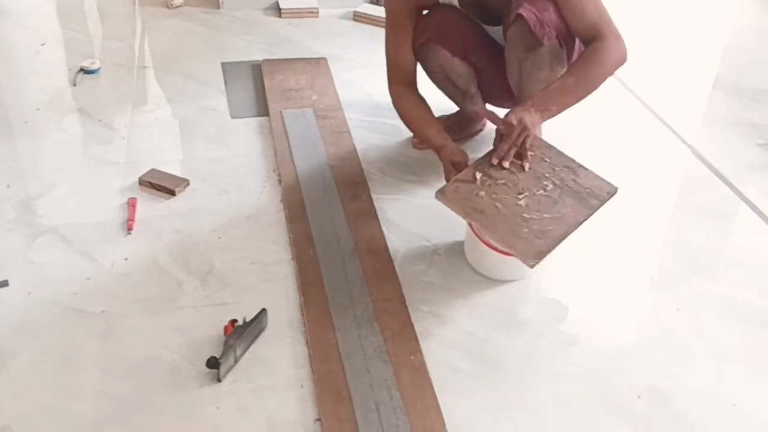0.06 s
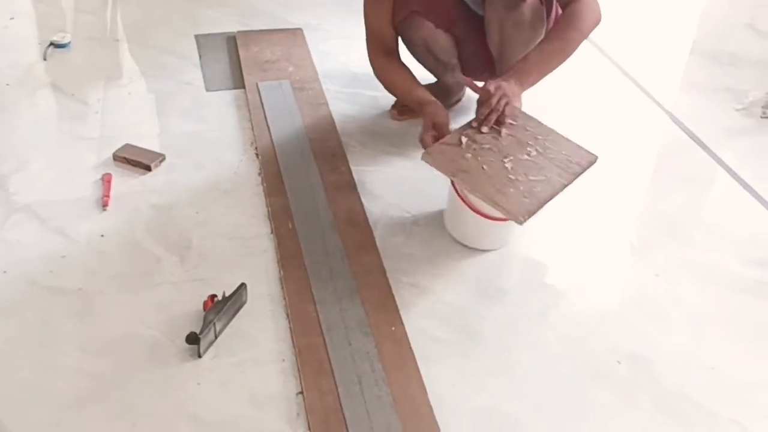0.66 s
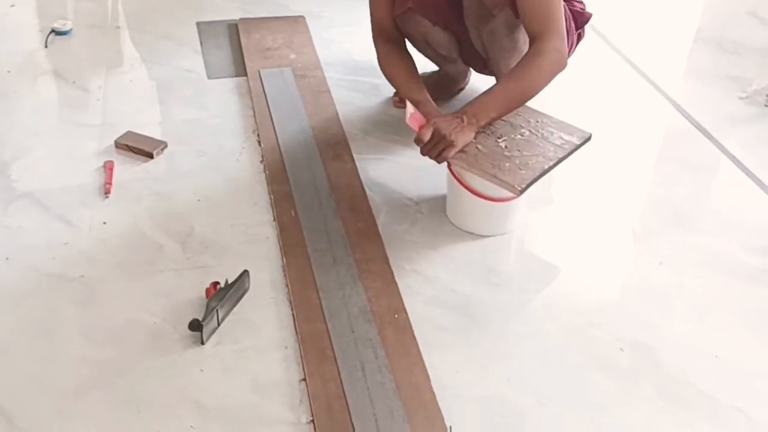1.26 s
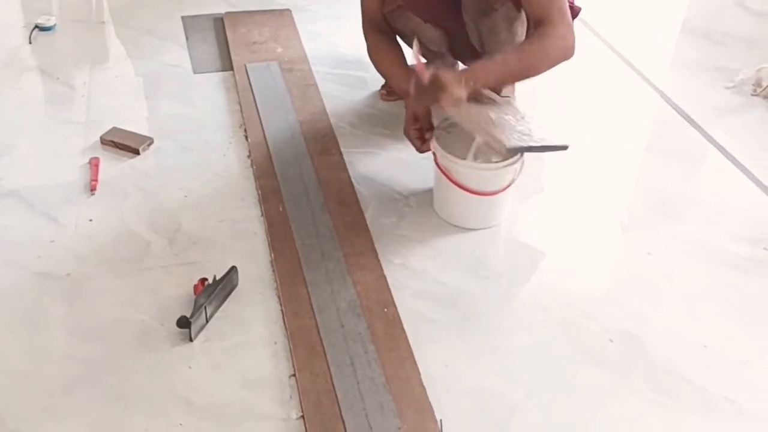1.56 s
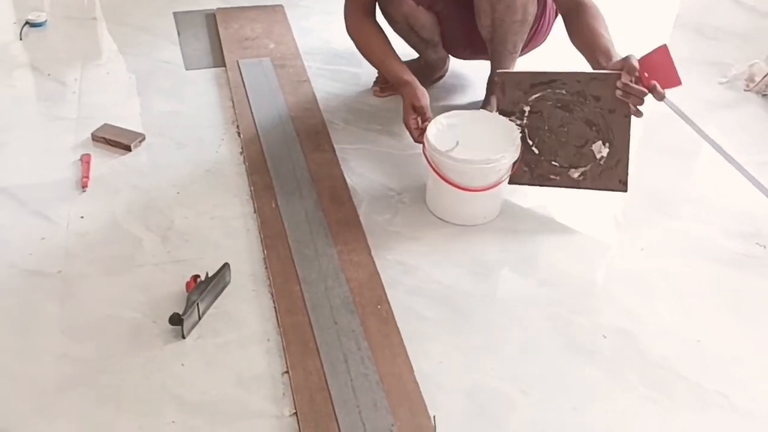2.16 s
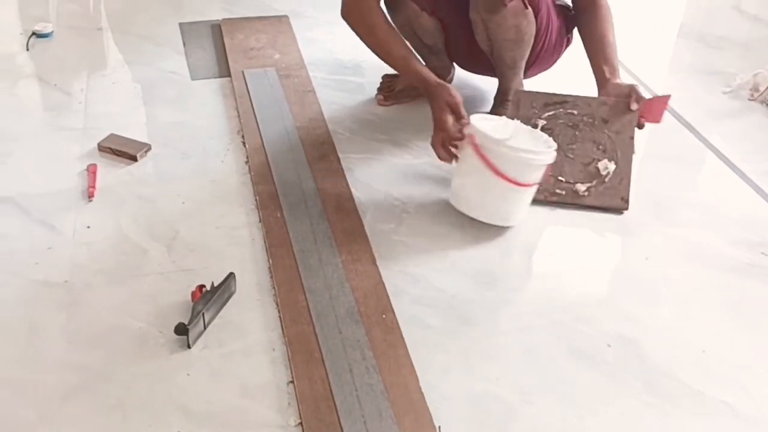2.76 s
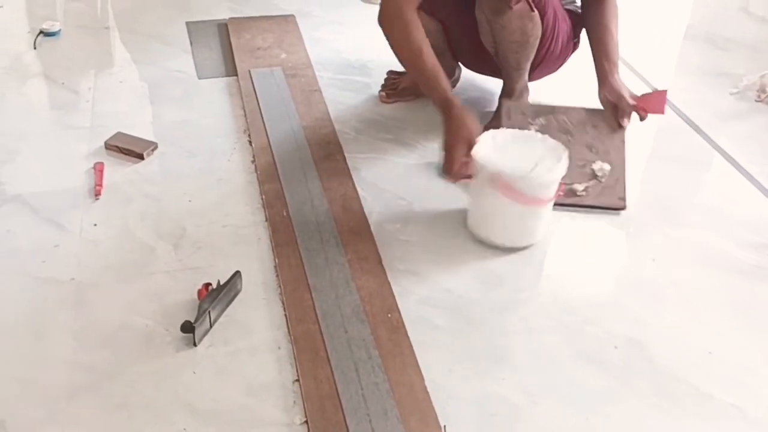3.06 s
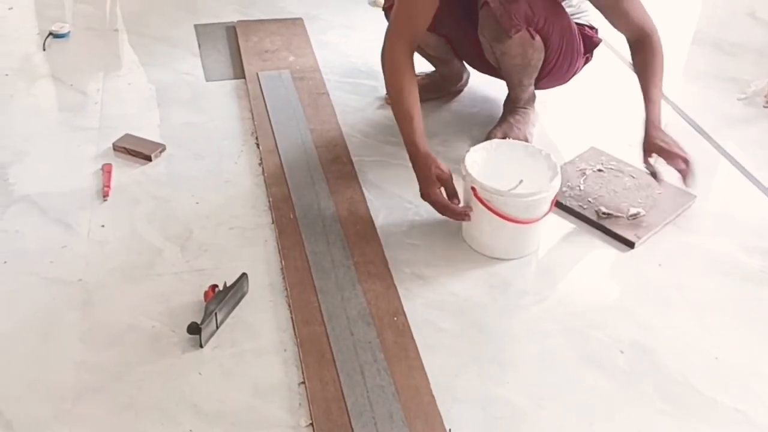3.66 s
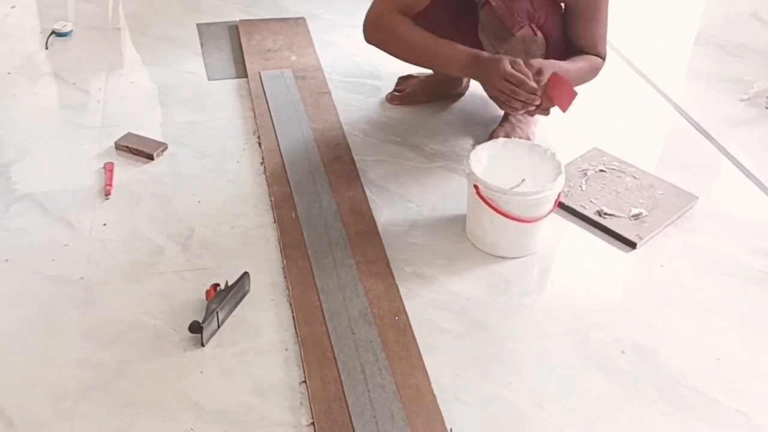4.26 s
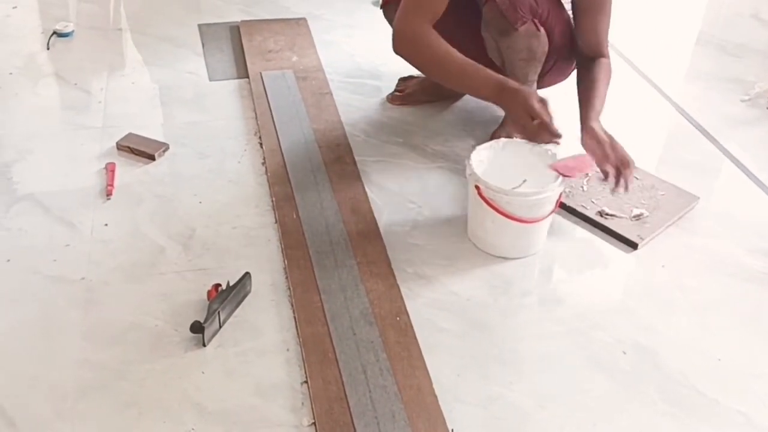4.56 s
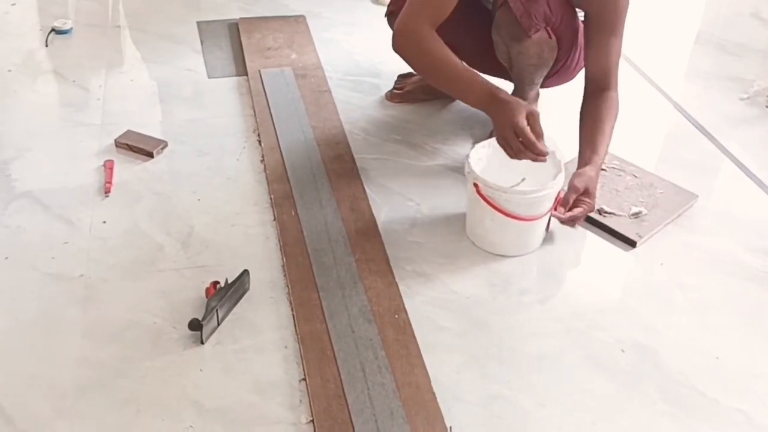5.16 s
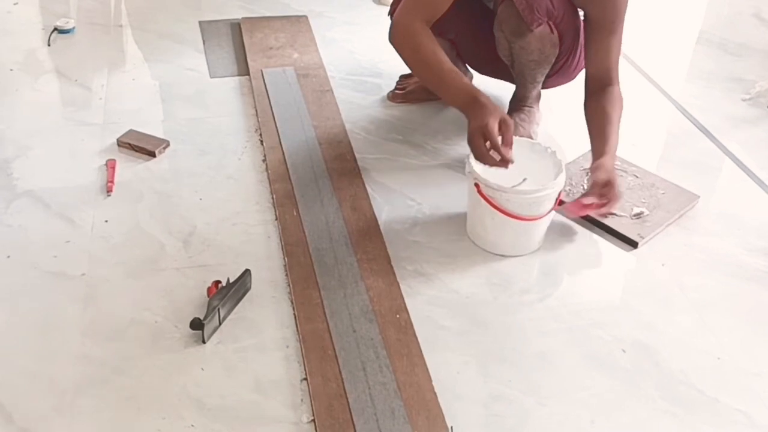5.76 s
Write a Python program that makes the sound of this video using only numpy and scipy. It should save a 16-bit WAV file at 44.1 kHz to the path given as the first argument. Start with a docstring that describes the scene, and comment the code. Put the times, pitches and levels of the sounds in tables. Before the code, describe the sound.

A plastic spatula snaps sharply at the start, ringing briefly in a bare, echoing room over a faint steady hush. Around 1 second come light taps on a tile and a soft bump. From 1.5 seconds grit crunches and a plastic bucket's rim groans faintly, then the tile rasps off it at about 2 seconds. At 2.5 seconds the tile thuds loudly onto its edge and rocks with a slight ring. The bucket lands with a click and hollow knocks near 3.2 seconds. At 3.4 the tile claps flat on the hard floor, bouncing and settling by 4 seconds. Dull bumps and shuffles of shifting weight follow. Near 4.9 seconds the spatula scrapes sharply, then rattles softly through wet mortar and gives a thin squeal around 5.4 seconds. The left microphone favours the middle tones, the right the treble.

```python
"""A tiler works in a bare, echoing room. A plastic spatula snaps, then taps at a mortared tile on a
plastic bucket. Grit crunches and the rim groans as he slides the tile off; it thuds onto its edge and
rocks. The bucket lands with hollow knocks, then the tile claps flat on a cushion of air and settles.
Last, the blade scrapes, rattles and squeals through wet mortar. Soft bumps of shifting weight come
between, over a steady hush; the left microphone favours the mids, the right one the treble."""
import sys
import numpy as np
from scipy import signal
from scipy.fft import rfft, irfft, next_fast_len
from scipy.io import wavfile
from scipy.ndimage import uniform_filter1d

SR = 44100
rng = np.random.default_rng(int(sys.argv[2]) if len(sys.argv) > 2 else 0)


def dump_mix(stems):
    """Bounce the given channels to the path in sys.argv[1] as a 16-bit WAV at rate SR."""
    frames = np.atleast_2d(stems).T  # one column per channel
    limited = np.clip(frames, -1, 1)  # hard clip at full scale
    pcm = np.round(limited * 32767).astype(np.int16)
    wavfile.write(sys.argv[1], SR, pcm)


N = 260190

# The tile's resonances. Each row: centre in Hz, width in Hz, lift in dB.
TILE_MODES = [(420, 30, 6.5), (708, 54, 14.5), (1064, 100, 2), (1487, 130, 12.5), (2092, 55, 8),
              (2910, 140, 5.5), (3200, 110, 4), (3885, 120, 4)]


def amp(db):
    """Decibels to gain."""
    return 10 ** (np.asarray(db) / 20)


def unit(x):
    """Scale a signal to an rms of 1."""
    return x / np.sqrt(np.mean(x ** 2) + 1e-20)


def along(points, hz):
    """Read a curve of (Hz, value) points on a log frequency axis."""
    freqs, values = np.transpose(points)
    return np.interp(np.log(hz + 1), np.log(np.abs(freqs) + 1), values)


def filtered(x, response):
    """Equalise a signal with a gain given as a function of frequency."""
    count = x.shape[-1]
    padded = next_fast_len(count + SR // 16, real=True)
    return irfft(rfft(x, padded) * response(np.fft.rfftfreq(padded, 1 / SR)), padded)[..., :count]


def add(track, s, sound):
    """Mix a sound into the track from second s on."""
    start = max(round(s * SR), 0)
    part = sound[..., :N - start]
    track[..., start:start + part.shape[-1]] += part


def body(colour, modes=(), size=4096):
    """An object's ring: a minimum-phase impulse response, its broad colour lifted at the resonances."""
    hz = np.fft.rfftfreq(size, 1 / SR)
    peaks_db = sum(lift / (1 + (2 * (hz - centre) / width) ** 2) for centre, width, lift in modes)
    cepstrum = irfft(np.log(np.maximum(amp(along(colour, hz) + peaks_db), 1e-4)))
    cepstrum[1:size // 2] *= 2
    cepstrum[size // 2 + 1:] = 0
    ring = irfft(np.exp(rfft(cepstrum)))[:size // 2]
    return ring / np.linalg.norm(ring)


def diffuse(count):
    """White noise arriving from all sides: nearly mono in the bass, wide above."""
    # Each row: frequency in Hz, left-right correlation.
    likeness = [(60, 0.93), (140, 0.94), (280, 1), (550, 0.52), (1100, 0.022), (3000, 0.012), (8000, 0.024)]
    def mid_side_gains(hz):
        angle = np.arccos(np.clip(along(likeness, hz), -1, 1)) / 2
        return np.array([np.cos(angle), np.sin(angle)])
    mid, side = filtered(rng.standard_normal((2, count)), mid_side_gains)
    return np.array([mid + side, mid - side])


def room(direct_db, pan_db, linger, size=SR * 3 // 4, build_s=0.01, first_share=0.55):
    """Direct sound, direct_db over an echo that builds and dies by band; positive pan_db leans left."""
    # Each row: frequency in Hz, reverb time in seconds before linger scales it.
    decay_times = [(100, 0.95), (300, 1), (700, 0.86), (1800, 0.91), (4000, 1), (7000, 0.73), (13000, 0.34)]
    hz, t, bands = signal.stft(diffuse(size), SR, nperseg=256)
    t60 = linger * along(decay_times, hz)[:, None]
    echo = signal.istft(bands * amp(-60 * t / t60), SR, nperseg=256)[1]
    t = np.arange(echo.shape[1]) / SR
    echo *= 1 - (1 - first_share) * np.exp(-(t / build_s) ** 2)
    echo /= np.linalg.norm(echo, axis=1, keepdims=True)
    echo[:, 0] += amp(direct_db)
    return echo * amp([[pan_db / 2], [-pan_db / 2]])


def heard(force, ring, path):
    """A force passed through an object's ring and the room."""
    return signal.fftconvolve(signal.fftconvolve(force, ring)[None], path, axes=1)


def blows(rows, ring, direct_db, pan_db, chatter, linger, graze, lead_s=0.0017, size=SR * 3 // 4):
    """Impacts that graze, hit and chatter; level is the energy spread over a tenth of a second."""
    out, t = np.zeros((2, N)), np.arange(-SR // 100, SR // 16) / SR
    for s, db, chatter_s in rows:
        noise = rng.standard_normal(len(t))
        before = noise * (t < 0) * np.exp(-np.abs(t) / lead_s)
        after = noise * (t > 0) * np.exp(-np.abs(t) / max(chatter_s, 1e-4))
        force = graze * before / np.linalg.norm(before) + (t == 0)
        force += chatter * after / np.linalg.norm(after)
        sound = heard(force, ring, room(direct_db, pan_db, linger, size))
        add(out, s + t[0], amp(db) * np.sqrt(SR / 10) * sound / np.linalg.norm(sound))
    return out


def strokes(rows, ring, grain_db, direct_db, pan_db, linger, fade_db=0, grain_samples=40):
    """Friction: uneven slips swell and die with each stroke, while the pressure eases by fade_db."""
    out = np.zeros((2, N))
    for s, length, db in rows:
        count = max(round(length * SR), 64)
        noise, sizes = rng.standard_normal((2, SR))[:, :count]
        roughness = unit(uniform_filter1d(sizes, size=grain_samples))
        slips = unit(noise * amp(grain_db * roughness))
        progress = np.linspace(0, 1, count)
        swell = np.sqrt(np.abs(np.sin(np.pi * progress))) * amp(db - fade_db * progress)
        add(out, s, heard(swell * slips, ring, room(direct_db, pan_db, linger)))
    return out


def sing(rows, partials, pan_db, size=SR * 3 // 4):
    """The least damped partials outlast each contact; their phase wanders at each microphone."""
    out, t = np.zeros((2, N)), np.arange(size) / SR
    swell = 1 - np.exp(-t / 0.024)
    for s, db, *_ in rows:
        for hz, offset_db, t60, width in partials:
            wander = np.cumsum(rng.standard_normal((2, size)), axis=1) * np.sqrt(2 * np.pi * width / SR)
            tone = np.sqrt(2) * np.sin(2 * np.pi * hz * t + wander)
            add(out, s, amp(db + offset_db - 60 * t / t60) * swell * tone)
    return out * amp([[pan_db / 2], [-pan_db / 2]])


def room_tone(level_db=-60.5):
    """The steady, dark hush of the room."""
    # Each row: frequency in Hz, level in dB.
    colour = [(15, -58), (25, -21), (192, -9), (308, -13.5), (380, -14.5), (456, -14.5), (520, -14.5),
              (1030, -17), (1440, -16.5), (1650, -18.5), (2850, -23), (3160, -23.5), (3800, -26.5),
              (5480, -26), (13000, -42.5)]
    return amp(level_db) * unit(filtered(diffuse(N), lambda hz: amp(along(colour, hz))))


def shifting_weight():
    """Dull bumps and shuffles boom in the room's low modes."""
    # A heel or knee takes the weight. Each row: start in seconds, level in dB, chatter in seconds.
    bumps = [(0.944, -52.5, 0.011), (0.972, -45.5, 0.0087), (1.024, -58, 0.018), (2.468, -51, 0.0072),
             (4.21, -47, 0.0027), (4.385, -45.5, 0.0065), (4.58, -62.5, 0.0079), (5.085, -52.5, 0.005)]
    # Each row: start in seconds, length in seconds, level in dB.
    shuffles = [(3.49, 0.36, -55), (3.78, 0.28, -59), (4.045, 0.18, -51.5), (4.305, 0.64, -50),
                (4.95, 0.1, -47.5)]
    # Each row: frequency in Hz, level in dB.
    colour = [(30, -68), (60, -6), (100, -3.5), (135, 0.5), (190, -9), (260, -11), (340, -20), (600, -24),
              (1000, -61), (2000, -105.5)]
    boom = body(colour, [(76.3, 6.4, 7.3), (128.0, 25, 9.8), (189.6, 28, 12.7)])
    thuds = blows(bumps, boom, direct_db=2, pan_db=3, chatter=0.89, linger=0.83, graze=0.76,
                  lead_s=0.006)
    return thuds + strokes(shuffles, boom, grain_db=2, direct_db=6.5, pan_db=4, linger=0.41,
                           fade_db=15.5, grain_samples=900)


def mortar_grit():
    """Dry mortar crunches in each rub; hard little contacts of mortar and blade tick."""
    # Each row: start in seconds, length in seconds, level in dB.
    rubs = [(1.548, 0.05, -60.5), (1.59, 0.21, -55.5), (1.82, 0.13, -54.5), (2.712, 0.24, -67)]
    # Each row: start in seconds, level in dB, chatter in seconds, pitch in Hz.
    ticks = [(0.016, -42, 0.0016, 8100), (0.463, -68.5, 0.003, 2630), (0.6383, -71.5, 0.0014, 6800),
             (1.572, -59, 0.0041, 1900), (1.6, -53.5, 0.0028, 1700), (1.634, -57, 0.003, 3200),
             (1.699, -49.5, 0.0031, 1650), (1.879, -53.5, 0.0097, 6700), (1.898, -57, 0.0027, 3450),
             (1.953, -55, 0.0037, 6640), (4.9161, -44.5, 0.0012, 4200), (4.948, -43, 0.0039, 2840),
             (5.8335, -69, 0.0012, 7590)]
    # Each row: frequency in Hz, level in dB.
    colour = [(60, -52.5), (300, -10.5), (700, -18), (1400, -14.5), (2400, -13), (6200, -13.5),
              (12000, -21), (14000, -33)]
    out = strokes(rubs, body(colour), grain_db=5, direct_db=-4, pan_db=4, linger=0.27)
    for *contact, hz in ticks:
        out += blows([contact], body(colour, [(hz, 0.62 * hz, 13)]),
                     direct_db=3, pan_db=-2.5, chatter=3.6, linger=0.26, graze=0.7, size=SR // 4)
    return out


def light_taps(overtone_ratio=1.76):
    """Hand and spatula tap the held tile, each tap ringing briefly at its own pitch."""
    # Each row: start in seconds, level in dB, chatter in seconds, pitch in Hz, overtone lift in dB.
    taps = [(0.824, -66.5, 0.0043, 3120, -2.5), (0.962, -59.5, 0.015, 678, 8.5),
            (1.028, -66.5, 0.006, 704, -5), (1.049, -60.5, 0.005, 4355, 2.5), (1.183, -63, 0.008, 660, 1.5),
            (1.186, -53, 0.014, 1700, 19.5)]
    out = np.zeros((2, N))
    for *contact, hz, overtone_db in taps:
        colour = [(hz / 8, -28), (hz / 0.99, -7), (hz, 0), (hz * 1.1, -15), (hz * 4.5, -42)]
        ring = body(colour, [(hz, 0.22 * hz, 9), (overtone_ratio * hz, 300, overtone_db)])
        out += blows([contact], ring, direct_db=-4, pan_db=-1, chatter=1, linger=0.35, graze=0.14,
                     size=SR // 2)
    return out


def rim_groan(jitter_share=0.1, db_per_octave=-9):
    """The bucket's rim sticks and slips under the dragged tile: a rough tone with weak overtones."""
    # It rises as the weight comes off and sags as the tile slips free.
    # Each row: time in seconds, pitch in Hz, level in dB.
    glide = [(1.58, 328.3, -66.5), (1.628, 350.4, -50), (1.645, 353.7, -52), (1.665, 359.6, -52.5),
             (1.715, 332.8, -59), (1.745, 370.7, -54.5), (1.77, 404.6, -69.5), (1.795, 430, -58),
             (1.85, 407, -71), (1.915, 393, -64.5), (1.965, 293.6, -73.5)]
    s, hz, db = np.transpose(glide)
    t = np.arange(s[0], s[-1], 1 / SR)
    jitter = unit(uniform_filter1d(rng.standard_normal(SR), size=128))[:len(t)]
    phase = 2 * np.pi * np.cumsum(np.interp(t, s, hz) * (1 + jitter_share * jitter)) / SR
    tone = unit(sum(amp(db_per_octave * np.log2(k)) * np.sin(k * phase) for k in range(1, 5)))
    groan = amp(np.interp(t, s, db)) * tone
    out = np.zeros((2, N))
    add(out, s[0], heard(groan, [1.0], room(direct_db=6.5, pan_db=-0.5, linger=0.58)))
    return out


def bucket_landing():
    """The plastic bucket clicks down, its full base knocks, its rim skids and its handle slips down."""
    # Each row: start in seconds, level in dB, chatter in seconds; thumps add a pitch in Hz.
    clicks, thumps = [(3.1525, -30.5, 0.005), (3.239, -53, 0.0067)], [(3.149, -37.5, 0.003, 589), (3.168, -33.5, 0.0056, 436),
                                             (3.24, -31.5, 0.0063, 518), (3.28, -33.5, 0.011, 398)]
    # The rim skids, then the handle slips. Each row: start in seconds, length in seconds, level in dB.
    bucket_rubs = [(3.212, 0.034, -41), (3.625, 0.1, -58.5)]
    # Each row: centre in Hz, width in Hz, lift in dB.
    plastic_modes = [(597, 110, 3.2), (2600, 350, 8), (5940, 1600, 12), (6990, 770, 17)]
    # Each row: frequency in Hz, level in dB.
    click_colour, thump_colour, rub_colour = [(500, -77), (1280, -1.5), (1700, -6.5), (2700, -11.5),
                                              (3600, -3.5), (4700, -10.5), (5700, -7), (7200, -13),
                                              (8500, -9.5), (11500, -17), (14000, -33.5)], [(47, -31), (80, -19), (172, -7.5), (290, -4.5),
                                                             (360, -8.5), (450, 3.5), (620, -10),
                                                             (950, -12), (1300, -16), (2000, -38),
                                                             (2600, -42), (4400, -120)], [(500, -35.5), (1280, -1),
                                                                            (2700, -10), (5700, -8.5),
                                                                            (7200, -18), (8500, -6),
                                                                            (11500, -7.5), (14000, -22)]
    out = blows(clicks, body(click_colour, plastic_modes),
                direct_db=0, pan_db=1.5, chatter=0.12, linger=0.52, graze=1)
    for *contact, hz in thumps:
        out += blows([contact], body(thump_colour, [(hz, 150, 8)]),
                     direct_db=1, pan_db=0.1, chatter=0.64, linger=0.66, graze=0.13)
    return out + strokes(bucket_rubs, body(rub_colour, plastic_modes),
                         grain_db=6, direct_db=-0.5, pan_db=2.9, linger=0.83, fade_db=-11.5)


def spatula():
    """The thin blade snaps, scrapes, knocks along the tile, pushes wet mortar and squeals."""
    # Each row: start in seconds, level in dB, chatter in seconds.
    snaps, rattles = [(0.0148, -31.5, 0.0015), (0.036, -34.5, 0.0094), (0.0516, -32.5, 0.0046)], [(4.953, -58, 0.0014), (5.005, -52, 0.0079), (5.034, -62, 0.0034),
                                     (5.111, -47.5, 0.0064), (5.2, -51, 0.0051), (5.239, -53, 0.0054),
                                     (5.324, -56.5, 0.012)]
    # Each row: start in seconds, length in seconds, level in dB.
    scrapes, smears, squeals = [(4.74, 0.13, -70.5), (4.903, 0.029, -48), (4.935, 0.027, -34),
                                (4.965, 0.09, -49)], [(4.94, 0.46, -55)], [(5.372, 0.15, -59.5)]
    # Each row: frequency in Hz, level in dB.
    snap_colour, scrape_colour = [(150, -27.5), (550, -27.5), (700, -14), (1000, -17.5), (1400, -10),
                                  (3400, -3.5), (5000, -5.5), (7500, -6), (9300, -11), (11000, -25),
                                  (14000, -15.5)], [(180, -65.5), (300, -17.5), (441, 1.5), (553, -37.5),
                                                (895, -4), (1160, -1.5), (1500, 7), (2170, -2.5),
                                                (2720, -2.5), (6790, -1.5), (14000, -18)]
    smear_colour, squeal_colour = [(350, -77.5), (600, -16), (638, -17), (679, -12.5), (886, 0.5),
                                   (1090, 1.5), (1370, -4.5), (1660, 6.5), (1830, 2.5), (2640, -6),
                                   (5000, -30.5), (6500, -17.5), (11000, -120)], [(100, -44), (600, 2), (1500, 15.5), (4800, 10.5),
                                                  (6500, 1), (9000, -8), (14000, -23.5)]
    # Each row: centre in Hz, width in Hz, lift in dB.
    blade_modes, squeal_modes = [(740, 84, 5.7), (1250, 120, 5.5), (1618, 70, 6.8), (3410, 130, 9),
                                 (4350, 300, 3), (5970, 650, 7.5)], [(2050, 200, 3.6), (3390, 240, 7), (4790, 190, 14),
                                                      (6300, 570, 19)]
    # Each row: pitch in Hz, level against the contact in dB, ring time in seconds, width in Hz.
    blade_partials, squeal_partials = [(3350, -12.5, 0.78, 70), (3510, -17, 0.75, 61.3), (5870, -21, 1, 56)], [(4740, -1, 0.9, 22)]
    snap = blows(snaps, body(snap_colour, blade_modes),
                 direct_db=-10, pan_db=0.5, chatter=0.97, linger=0.75, graze=0.45, lead_s=0.0023)
    scrape = strokes(scrapes, body(scrape_colour),
                     grain_db=-1.5, direct_db=-2.5, pan_db=2.5, linger=0.81)
    wet_blade = body(smear_colour, blade_modes)
    rattle = blows(rattles, wet_blade,
                   direct_db=-2.5, pan_db=-3.5, chatter=1, linger=0.55, graze=0.2, size=SR // 2)
    smear = strokes(smears, wet_blade, grain_db=2, direct_db=-8.5, pan_db=0.5, linger=0.75, fade_db=9.5)
    squeal = strokes(squeals, body(squeal_colour, squeal_modes),
                     grain_db=7.5, direct_db=-1, pan_db=1, linger=0.79)
    whistle = sing([(s, db) for s, _, db in squeals], squeal_partials, pan_db=-4)
    return snap + sing(snaps, blade_partials, pan_db=3) + scrape + rattle + smear + squeal + whistle


def tile_slide():
    """The tile rasps off the bucket, each stroke easing as it goes."""
    # Each row: start in seconds, length in seconds, level in dB.
    slides = [(1.945, 0.091, -44), (2.08, 0.26, -40)]
    # Each row: frequency in Hz, level in dB.
    colour = [(240, -64), (400, -18.5), (535, -2), (829, -2), (1030, -11), (1260, 0.5), (5500, -13),
              (6100, -5), (7470, -19.5), (8280, -25.5), (13000, -41)]
    return strokes(slides, body(colour),
                   grain_db=-1.5, direct_db=-2.5, pan_db=-4.5, linger=1, fade_db=19.5)


def tile_rocking(chatter_s=0.003):
    """Gentle contacts only bend the tile and leave it singing."""
    # Each row: start in seconds, level in dB.
    rocks = [(2.721, -37), (2.837, -47), (2.905, -53), (3.02, -58), (3.444, -39.5), (3.661, -37.5),
             (3.674, -32.5), (3.78, -43), (3.878, -46.5), (3.918, -60), (3.99, -51.5)]
    # Each row: frequency in Hz, level in dB.
    flex_colour = [(40, -51.5), (150, -35.5), (450, -11.5), (620, -10.5), (720, -7), (1000, -20.5),
                   (2500, -36), (5000, -69.5)]
    # Each row: pitch in Hz, level against the contact in dB, ring time in seconds, width in Hz.
    partials = [(707, -11, 0.9, 0.6), (2980, -27, 0.98, 26)]
    knocks = blows([(s, db, chatter_s) for s, db in rocks], body(flex_colour, [(714, 150, 25)]),
                   direct_db=15.5, pan_db=-2, chatter=0.065, linger=0.78, graze=0.035, size=SR // 2)
    return knocks + sing(rocks, partials, pan_db=-4.5)


def tile_on_edge(held_share=0.28):
    """The tile thuds onto its edge, damped by the hand; a harder contact lifts the mids."""
    # Each row: start in seconds, level in dB, chatter in seconds, mid lift in dB.
    knocks = [(2.5475, -19.5, 0.0069, 1), (2.616, -28, 0.0098, -3.5)]
    # Each row: frequency in Hz, level in dB.
    colour = [(29, -54), (50, -26), (107, -14), (204, -2.5), (300, 1), (438, -2), (520, 0.5), (640, -1),
              (755, -1), (830, -22), (1130, -17), (1400, -21.5), (1580, -25), (1730, -13), (1950, -28.5),
              (2080, -24), (2390, -37.5), (3130, -30.5), (3470, -39), (4000, -41), (7000, -52), (9100, -65)]
    held_modes = [(hz, width, held_share * lift) for hz, width, lift in TILE_MODES]
    return sum(blows([contact], body(colour, held_modes + [(1700, 2000, mid_db)]),
                     direct_db=-1, pan_db=0, chatter=0.76, linger=0.87, graze=0.12)
               for *contact, mid_db in knocks)


def tile_drop(cushion_width_hz=104, cushion_db=15):
    """The tile claps flat and settles; the air under it resonates higher as the gap closes."""
    # Each row: start in seconds, face slap in dB, corner crack in dB, chatter in seconds,
    # air cushion pitch in Hz.
    bounces = [(3.398, -21, -34.5, 0.0013, 560), (3.438, -25, -43.5, 0.011, 585),
               (3.519, -27, -87, 0.017, 590), (3.632, -27.5, -54, 0.0035, 760),
               (3.66, -48, -55.5, 0.0062, 800), (3.732, -34, -69, 0.00053, 870),
               (3.779, -56, -67, 0.0054, 875)]
    # Each row: frequency in Hz, level in dB.
    slap_colour, crack_colour = [(50, -41), (110, -18), (280, -23), (400, -15.5), (500, -9), (650, -14.5),
                                 (760, -11.5), (950, -13.5), (1300, -10.5), (1600, -13.5), (2100, -13),
                                 (2400, -19.5), (3200, -23.5), (4000, -32), (5300, -39.5), (7000, -46),
                                 (12000, -91)], [(800, -40), (2200, -6.5), (3200, 13.5), (3600, 8),
                                               (4000, -12), (5000, -11.5), (12000, -49)]
    slaps = np.zeros((2, N))
    for s, db, _, chatter_s, cushion_hz in bounces:
        ring = body(slap_colour, TILE_MODES + [(cushion_hz, cushion_width_hz, cushion_db)])
        slaps += blows([(s, db, chatter_s)], ring,
                       direct_db=-12.5, pan_db=-1, chatter=1.58, linger=0.75, graze=0.03)
    corners = [(s, db, chatter_s) for s, _, db, chatter_s, _ in bounces]
    return slaps + blows(corners, body(crack_colour, TILE_MODES),
                         direct_db=8.5, pan_db=-6, chatter=1, linger=0.2, graze=0.084)


def suppress(x, depth_db=9.5, threshold_db=4, knee_db=5, size=1024, overlap=4):
    """Bands that sink near the hush are turned down, so echoes end early and resonances sing on."""
    frames = dict(nperseg=size, noverlap=size - size // overlap)
    bands = signal.stft(x, **frames)[2]
    power = uniform_filter1d(np.mean(np.abs(bands) ** 2, axis=0), size=3, axis=0)
    level_db = 10 * np.log10(np.abs(uniform_filter1d(power, size=overlap, axis=1)) + 1e-20)
    hush_db = uniform_filter1d(np.percentile(level_db, 15, axis=1), size=5)[:, None]
    closed = (1 - np.tanh((level_db - hush_db - threshold_db) / (2 * knee_db))) / 2
    return signal.istft(bands * amp(-depth_db * closed), **frames)[1][:, :N]


def scene(left_lag_s=0.00092):
    """The work over the hush, coloured differently by each microphone and reaching the left later."""
    # Each row: frequency in Hz, left minus right in dB.
    balance = [(60, -0.5), (110, 0), (200, -1), (370, 5.5), (680, 11.5), (1250, 8.5), (2290, 0),
               (4210, -2.5), (7730, -9.5), (14200, -3)]
    hush = room_tone()
    tile = tile_slide() + tile_on_edge() + tile_drop() + tile_rocking()
    bucket = bucket_landing() + rim_groan()
    work = tile + bucket + spatula() + light_taps() + shifting_weight() + mortar_grit()
    mix = filtered(work, lambda hz: amp(np.outer([1, -1], along(balance, hz)) / 2)) + hush
    return filtered(mix, lambda hz: np.exp(-1j * np.pi * np.outer([1, -1], hz) * left_lag_s))


def record(dry, top_hz=14350):
    """Steady noise is suppressed and the highest treble is cut off."""
    return filtered(suppress(dry), lambda hz: hz < top_hz)


dry = scene()
out = record(dry)
dump_mix(out)
```